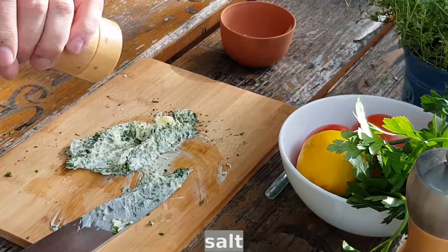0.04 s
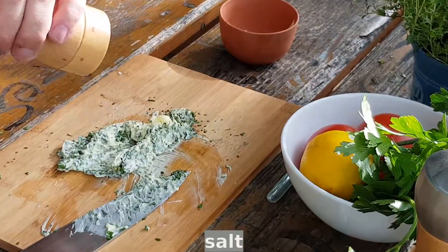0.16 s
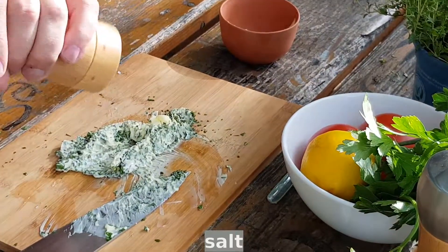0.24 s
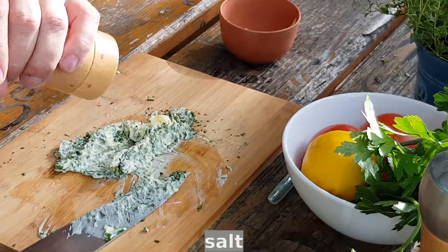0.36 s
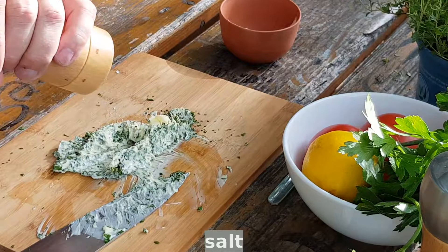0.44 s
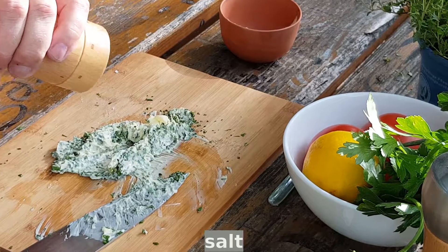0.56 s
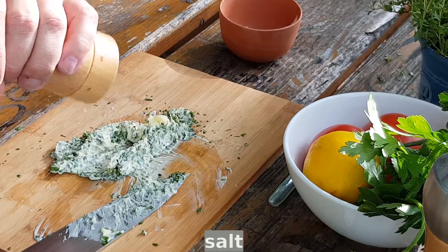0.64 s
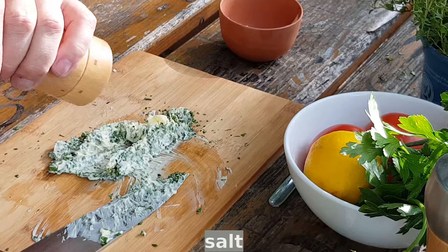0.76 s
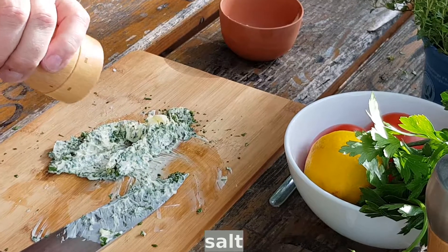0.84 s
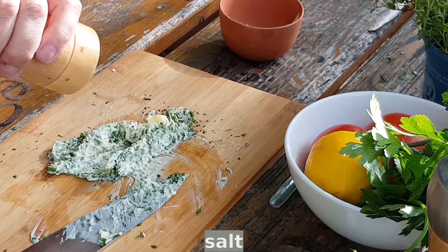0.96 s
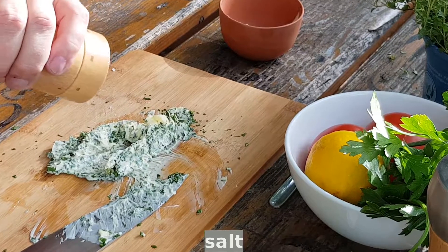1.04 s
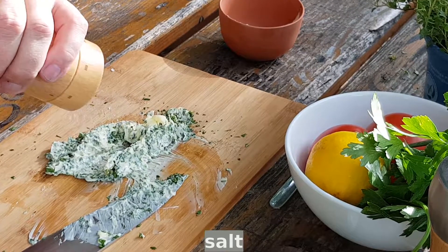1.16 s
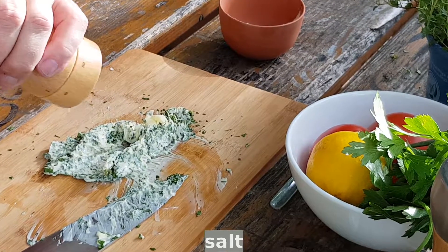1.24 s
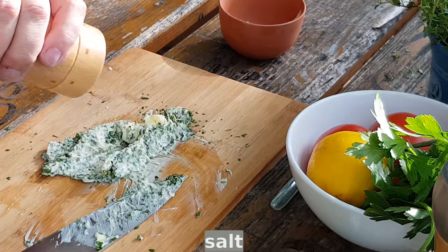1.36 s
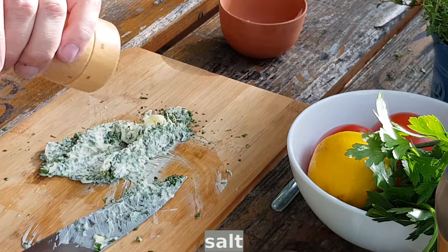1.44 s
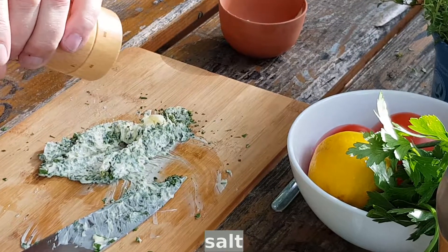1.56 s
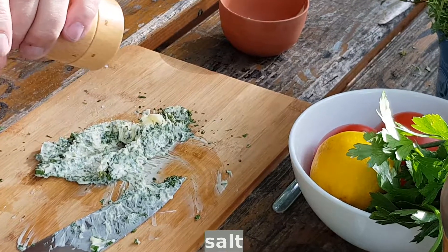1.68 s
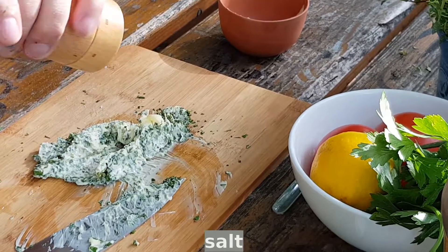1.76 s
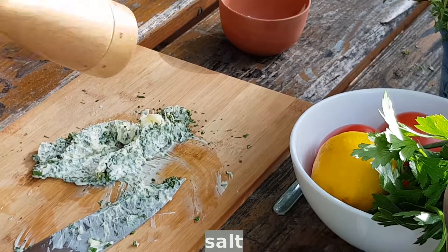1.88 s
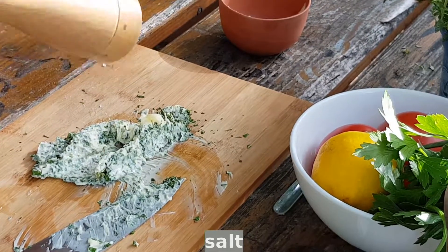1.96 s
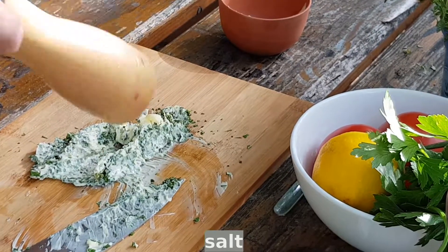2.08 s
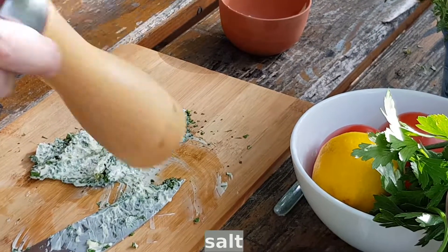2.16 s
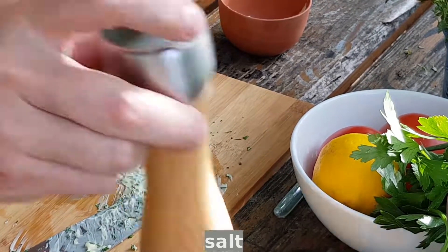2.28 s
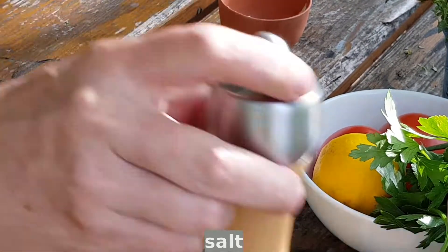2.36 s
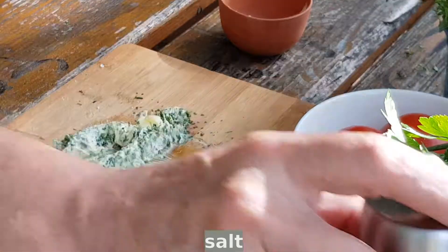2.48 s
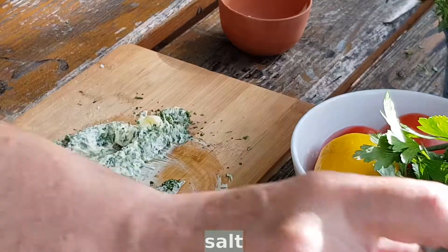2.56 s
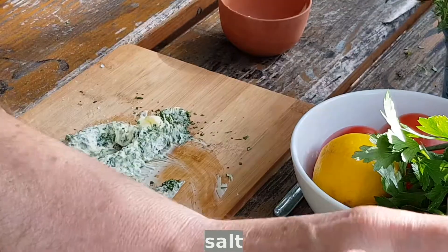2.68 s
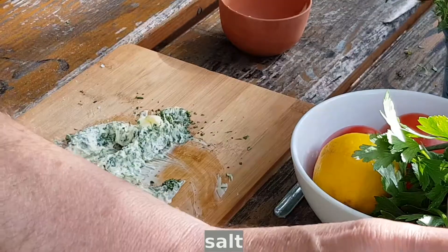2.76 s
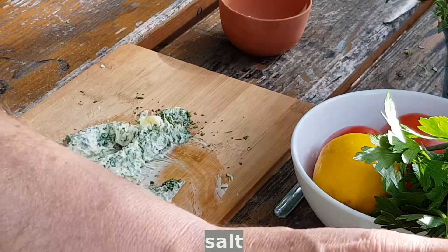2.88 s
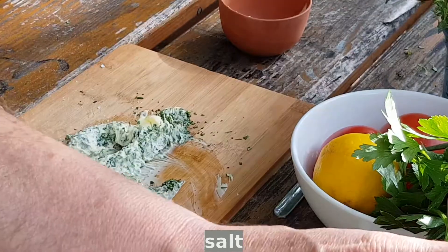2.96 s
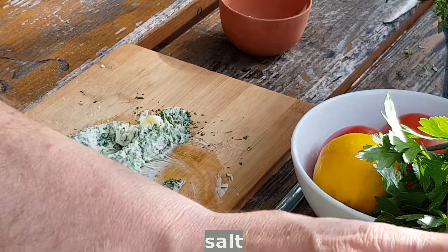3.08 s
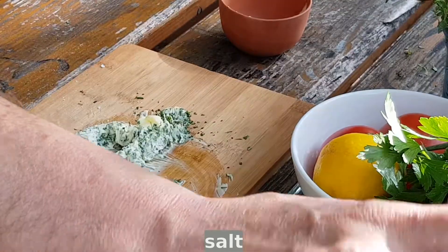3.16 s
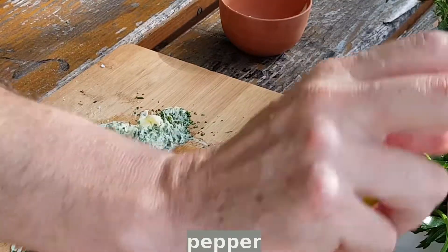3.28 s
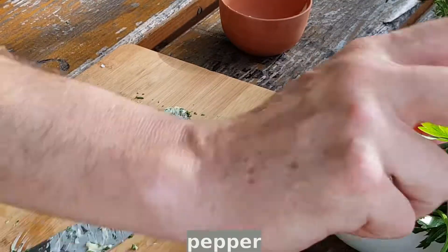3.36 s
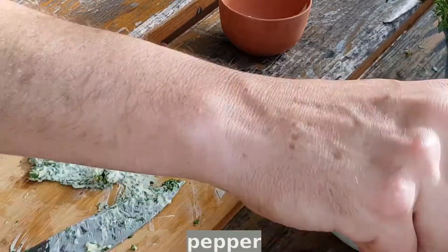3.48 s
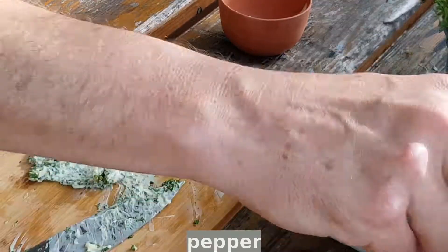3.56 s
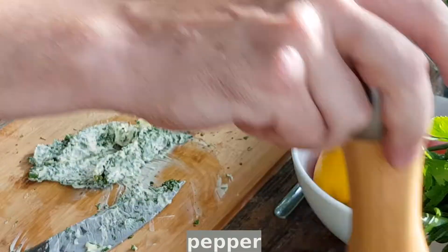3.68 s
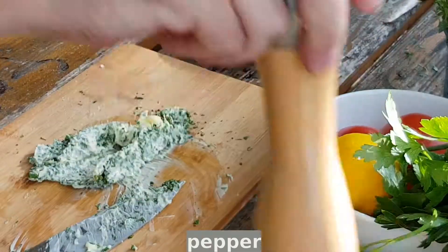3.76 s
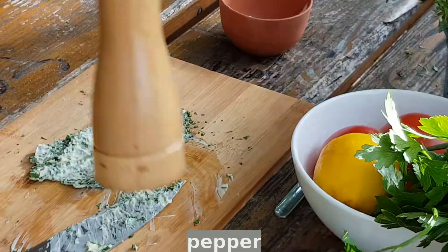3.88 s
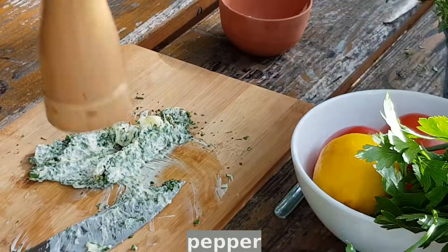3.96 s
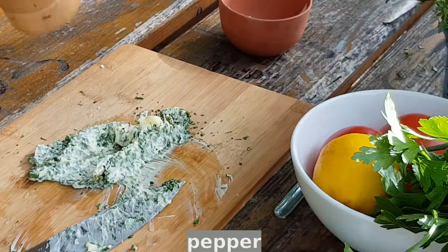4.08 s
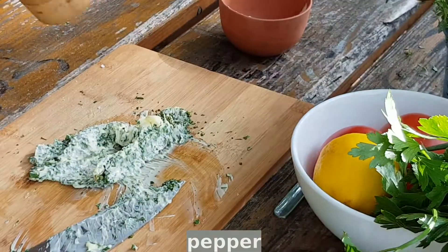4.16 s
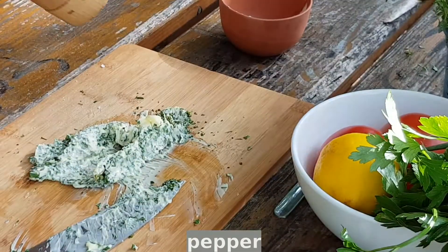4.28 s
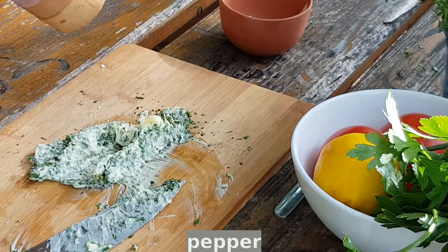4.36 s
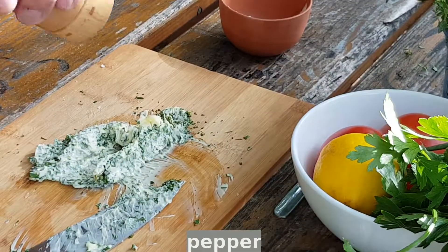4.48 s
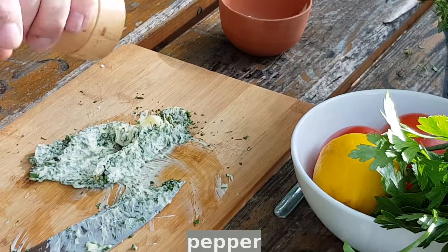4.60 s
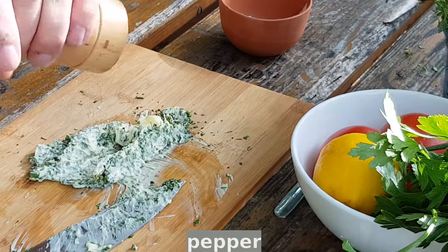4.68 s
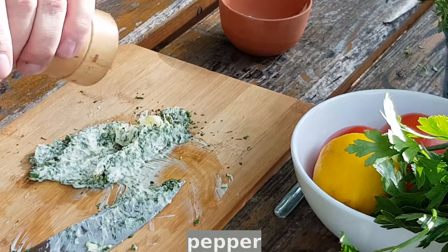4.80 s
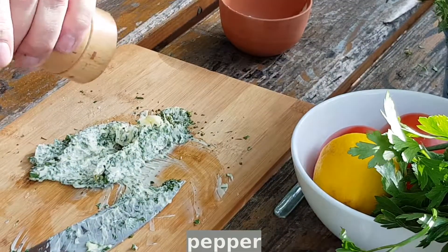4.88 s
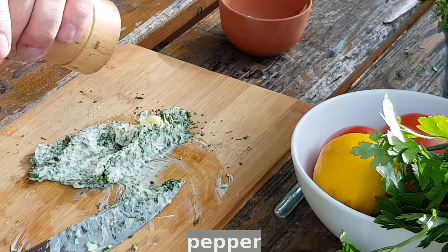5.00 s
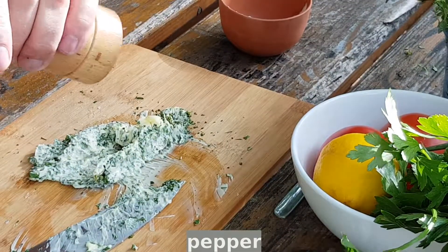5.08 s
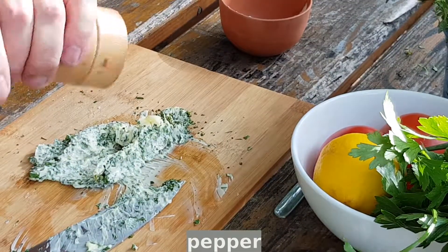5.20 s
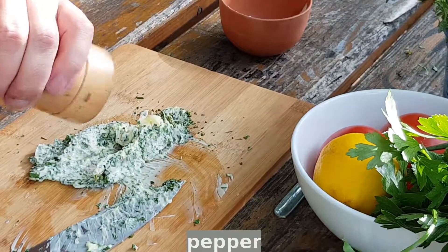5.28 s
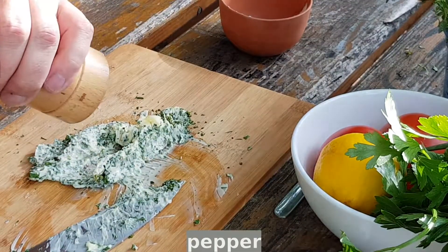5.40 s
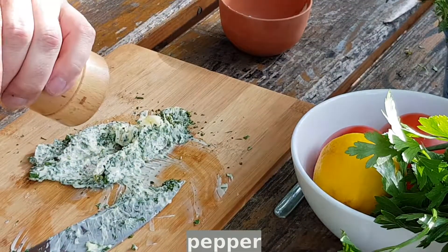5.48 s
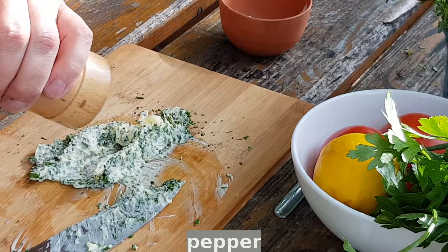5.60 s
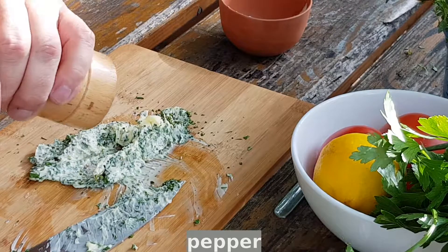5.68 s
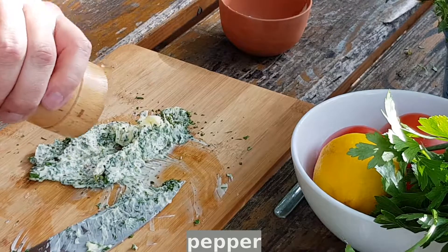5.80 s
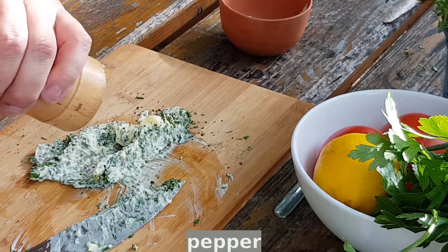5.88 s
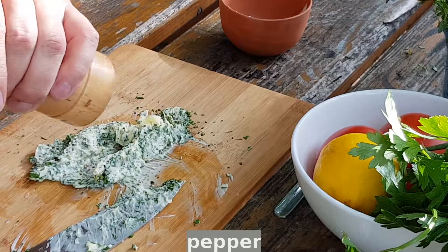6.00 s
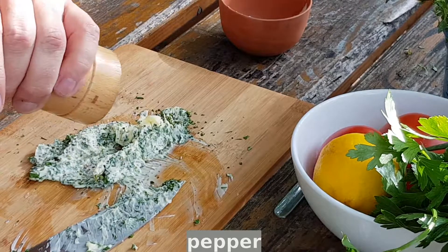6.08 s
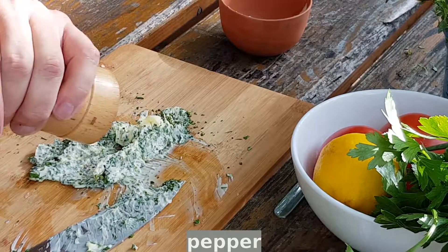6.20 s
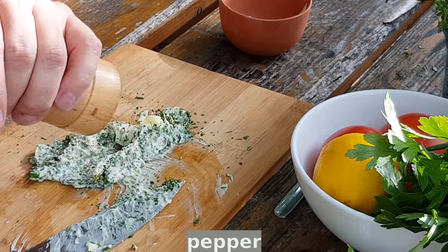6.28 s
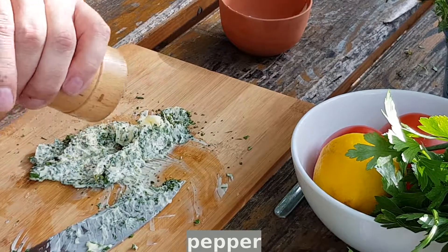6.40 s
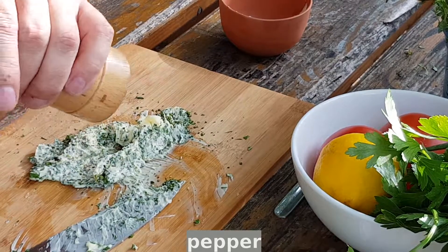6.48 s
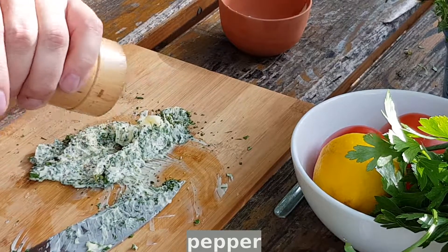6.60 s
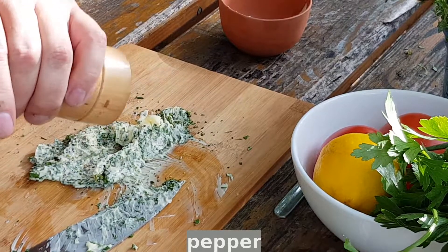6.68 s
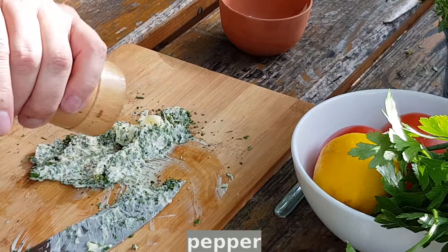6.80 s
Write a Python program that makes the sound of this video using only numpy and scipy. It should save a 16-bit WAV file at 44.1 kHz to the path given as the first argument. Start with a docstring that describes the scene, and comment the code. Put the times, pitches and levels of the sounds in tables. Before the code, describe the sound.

Close by at an outdoor table, a wooden salt mill is twisted four times, each turn a short, bright, gritty rasp with a few sharp cracks. It is set down with a knock, and after some faint clicks a pepper mill gives five coarser crunches. Gusts of wind rumble on the stereo microphone throughout, while very faint birds and traffic sit far behind.

```python
"""A puff of wind on the microphone, then the bright rasp of a wooden salt mill, close by at an outdoor table.
It is twisted four times and set down with a knock; a pepper mill is picked up and twisted five times.
Each twist crushes grains between the burrs: tiny fractures and a few sharp cracks ring in the barrel.
Gusts keep buffeting the stereo microphone; far off, birds whistle and traffic swells from the right."""
import sys
import numpy as np
from scipy import signal
from scipy.fft import rfft, irfft, next_fast_len
from scipy.io import wavfile
from scipy.ndimage import map_coordinates

SR = 44100
rng = np.random.default_rng(int(sys.argv[2]) if len(sys.argv) > 2 else 0)


def dump(signal):
    """Clip the signal to [-1, 1] and save it as 16-bit WAV at the path in sys.argv[1]."""
    limited = np.clip(np.atleast_2d(signal).T, -1, 1)
    pcm = np.round(limited * 32767).astype(np.int16)
    wavfile.write(sys.argv[1], SR, pcm)


N = 302085

# Levels in the tables are relative: each source applies its own gain.
# Strokes of each mill: (burrs catch [s], burrs stop [s], barrel [dB], burr [dB], splinters [dB],
# swell by the end [dB], hardening by the end [dB], brightness of the wedged burr [dB/octave])
SALT_TWISTS = [(0.155, 0.239, -37, -37.5, -43, -6, 5, 2), (0.56, 0.651, -39.5, -38, -43, -1.5, -1.5, 3),
               (0.934, 1.044, -39, -37.5, -40.5, -3, 1.5, 10),
               (1.307, 1.396, -41, -39, -43.5, 2.5, 2.5, 5.5)]
PEPPER_TWISTS = [(4.571, 4.621, -46.5, -37.5, -47.5, -3.5, -3.5, -6),
                 (4.634, 4.691, -42, -33, -48, -7.5, 1.5, -4.5),
                 (5.146, 5.232, -39, -38.5, -41.5, -3.5, -2.5, 6),
                 (5.626, 5.71, -39.5, -44, -47.5, -0.5, 2, -3.5), (6.075, 6.146, -41, -43.5, -54, 1, 13, 4),
                 (6.586, 6.657, -39, -33.5, -37.5, 1.5, -16, 3)]
# Big grains bursting; hard ones splinter, soft ones thump the barrel. The first salt row, just before the burrs
# catch, is instead the works clicking as the hand takes up the slack: (time [s], level [dB], hardness [dB])
SALT_CRACKS = [(0.133, -20.5, 6.5), (0.159, -18.5, 3), (0.175, -15.5, 5), (0.577, -16, 7.5),
               (0.616, -21, -2), (0.975, -8.5, -2), (1.019, -16, -8.5), (1.335, -12, -1), (1.39, -11, -1.5)]
PEPPER_CRACKS = [(4.575, -15, -2), (4.643, -23.5, -10), (5.146, -17.5, -0.5), (5.166, -13, -2),
                 (5.19, -11.5, -3.5), (5.631, -30.5, 17), (5.646, -15, 3.5), (6.065, -16, -2),
                 (6.099, -12.5, 0), (6.11, -18, 8), (6.156, -12.5, 0.5), (6.573, -24, 5),
                 (6.588, -12.5, 1.5)]
# Resonances of the wooden barrels and the burrs: (frequency [Hz], width [Hz], level [dB])
SALT_BARREL = [(647, 257, -7), (1190, 158, 2)]
SALT_BURR = [(1660, 240, -6), (2410, 830, -3), (3000, 300, -6.5), (3630, 340, -16)]
PEPPER_BARREL = [(498, 204, -4), (687, 166, 2), (1260, 326, -4.5)]
PEPPER_BURR = [(1720, 610, -0.5), (2875, 340, 5), (3930, 700, -3.5), (4260, 560, -5)]
# The snap of splintering grains: (frequency [Hz], level [dB])
SALT_SNAP = [(200, -12), (600, 1.5), (2000, 11.5), (4000, 1), (6000, -3), (7200, -10), (8500, 1),
             (10000, -3.5), (11200, 2.5), (13000, 3.5), (16000, -5)]
PEPPER_SNAP = [(200, -16), (600, -24), (2000, -15), (4000, 9), (5600, 0.5), (7000, -3), (8400, 3),
               (9400, -4.5), (10500, 3), (13000, 8), (14500, 0), (16000, 1.5)]
# Loose works clicking as a mill is moved: (time [s], level [dB], hardness [dB])
WORKS_CLICKS = [(1.452, -25.5, -2), (2.011, -30, 1), (2.445, -47.5, 10), (2.941, -37.5, 8.5),
                (3.898, -20.5, 4.5), (3.91, -36, 8), (4.292, -37.5, 4.5), (4.449, -29.5, 5.5),
                (4.5, -34, 2), (6.695, -35, 2)]
# The mills at the microphone, whose housing shades the treble: (frequency [Hz], left phase lead [rad])
MILL_PHASE = [(0, 0), (3600, 3), (8500, 4.5), (11000, 7), (14000, -0.5), (16000, 13)]
# Modes of the table under the salt mill: (frequency [Hz], level [dB], T60 before hand damping [s])
TABLE_MODES = [(411, 3, 0.13), (512, 2.5, 0.15), (639, 1, 0.1), (732, -5, 0.19), (900, -4, 0.03),
               (1010, -0.5, 0.13), (1187, -2, 0.11), (1390, -8, 0.1), (1460, -8, 0.024), (1530, -14, 0.12),
               (1586, -14, 0.11)]
# The thud of the landing mill and the rattle of its works: (frequency [Hz], level [dB])
LANDING_THUD = [(100, -48), (230, -16), (320, 12.5), (500, 5), (750, 8.5), (1100, 0), (1700, -22),
                (2700, -28), (4000, -38), (8000, -37)]
WORKS_RATTLE = [(800, -11), (1800, 1), (2800, 7), (4000, -34), (5000, -15), (8000, -9.5), (9500, -1),
                (11000, 7.5), (12500, 0), (16000, -13)]
# Close echoes off table top and crockery: (frequency [Hz], level against the direct sound [dB])
ECHO_LEVEL = [(300, -8.5), (1000, -5.5), (2500, -8), (4000, 3.5), (6000, 5.5), (12000, 0.5)]
# Decay of those echoes: (frequency [Hz], T60 [s])
ECHO_T60 = [(300, 0.19), (2000, 0.05), (6000, 0.025), (12000, 0.026)]
# The hand sliding on a mill: (peak time [s], rise [s], fall [s], level [dB])
HAND_SLIDES = [(2.018, 0.008, 0.099, -59), (3.67, 0.2, 0.3, -66), (3.835, 0.027, 0.08, -68),
               (3.93, 0.02, 0.095, -60), (4.01, 0.015, 0.11, -57.5), (4.09, 0.12, 0.24, -59.5)]
# Skin rubbing on wood: (frequency [Hz], level [dB])
SKIN_SPECTRUM = [(500, -22), (2000, 4), (5000, 0.5), (10000, 3.5), (16000, -5)]
# Light wind between the gusts: (time [s], level [dB])
LIGHT_WIND = [(0, -58.5), (0.9, -51.5), (1.45, -58), (3.7, -58.5), (4.15, -64.5), (4.7, -59), (6.85, -52)]
# Gusts on the microphone: (peak time [s], length [s], level [dB])
GUSTS = [(0.01, 0.091, -32), (0.347, 0.12, -46), (0.568, 0.2, -44), (0.808, 0.1, -40), (0.957, 0.36, -38.5),
         (1.214, 0.06, -45), (1.654, 0.2, -47), (1.773, 0.073, -46.5), (2.105, 0.27, -46.5),
         (2.393, 0.34, -48.5), (2.539, 0.036, -39.5), (2.621, 0.06, -41), (2.829, 0.038, -40),
         (3.189, 0.058, -44), (3.297, 0.082, -47), (3.547, 0.057, -43), (3.675, 0.41, -45),
         (4.906, 0.11, -39), (5.693, 0.08, -47.5), (6.653, 0.1, -40)]
# Rumble of eddies on the microphone: (frequency [Hz], level [dB])
BUFFET_SPECTRUM = [(12, -44), (20, -17), (44, -6), (65, 1.5), (119, -6), (178, -13.5), (282, -21),
                   (333, -23), (404, -28), (700, -36.5), (910, -48), (1540, -120)]
# Far birds: (time [s], length [s], start pitch [Hz], end pitch [Hz], level [dB])
BIRD_WHISTLES = [(0.81, 0.1, 2220, 2220, -63), (1.93, 0.1, 2090, 1880, -68),
                 (2.25, 0.11, 1310, 1450, -57.5), (4.3, 0.25, 2050, 2400, -68),
                 (4.88, 0.1, 1940, 1860, -63)]
# Far traffic drawing nearer: (time [s], level [dB])
TRAFFIC_LEVEL = [(0, -71), (1.7, -72.5), (2.4, -65.5), (3.2, -65.5), (4.3, -60.5), (6.85, -56.5)]
# The distant road and the hiss of the open air: (frequency [Hz], level [dB])
ROAD_SPECTRUM = [(100, 9.5), (300, 0.5), (600, 0), (950, 5), (1300, -3), (2000, -13), (3500, -32),
                 (8000, -38)]
AIR_SPECTRUM = [(180, -6.5), (300, -2), (656, -6.5), (828, -31), (1080, -9), (1970, -18.5), (3520, -20.5),
                (4910, -20.5), (12500, -21), (16000, -24.5)]

SWAP_S = 3.3  # the hand goes from the salt mill to the pepper mill


def salt_mill():
    """Close to the microphone, hard crystals break between the burrs: a dense, bright rasp."""
    twist = twisting(SALT_TWISTS, rise_s=0.069, fall_s=0.13, trim_db=[0, -0.5, 0.5])
    grit = fractures(per_s=4000, spread_db=5.3, clump_db=1.7, clump_rate=200)
    snaps = SALT_CRACKS + works_clicks(SALT_TWISTS, 0, SWAP_S)
    cracks = bursts(snaps, crumble_s=0.011, trim_db=[-0.5, 1.5, 0.5])
    return mill(twist * grit + cracks, SALT_TWISTS, SALT_BARREL, SALT_BURR, SALT_SNAP,
                detune=0.0085, left_db=0.5)


def pepper_mill():
    """At the same table, peppercorns break with a coarser, woodier crunch."""
    twist = twisting(PEPPER_TWISTS, rise_s=0.045, fall_s=0.1, trim_db=[0, -1.2, 0.6])
    grit = fractures(per_s=3200, spread_db=6, clump_db=2.4, clump_rate=180)
    snaps = PEPPER_CRACKS + works_clicks(PEPPER_TWISTS, SWAP_S, N / SR)
    cracks = bursts(snaps, crumble_s=0.0093, trim_db=[-1.5, 0, 0.5])
    return mill(twist * grit + cracks, PEPPER_TWISTS, PEPPER_BARREL, PEPPER_BURR, PEPPER_SNAP,
                detune=0.02, left_db=1.4)


def twisting(twists, rise_s, fall_s, trim_db):
    """Force on barrel, burr and splinters: it builds until the burrs catch, drifts, and lets go."""
    t, force = np.arange(N) / SR, np.zeros((3, N))
    for catch, stop, *levels, swell_db, hardening_db, _ in twists:
        drift_db = swell_db + hardening_db * np.array([[0], [1], [1]])
        progress = np.clip((t - catch) / (stop - catch), 0, 1)
        slack = np.maximum(catch - t, 0) / rise_s + np.maximum(t - stop, 0) / fall_s
        on = slack < 2
        force_db = np.array(levels)[:, None] + drift_db * progress[on] - 60 * slack[on]
        force[:, on] = np.maximum(force[:, on], amp(force_db))
    return force * amp(trim_db)[:, None]


def fractures(per_s, spread_db, clump_db, clump_rate):
    """Tiny breaks of very unequal size, bunched as the teeth catch and release; rms 1."""
    sizes = amp(spread_db * np.clip(rng.standard_normal(N), -2, 2)) * rng.choice([-1, 1], N)
    breaks = rng.random(N) < per_s / SR
    clumps = amp(clump_db * np.clip(wobble(clump_rate), -2, 2))
    return unit(breaks * sizes * clumps)


def works_clicks(twists, from_s, to_s, lead_s=0.025, take_up_db=-30):
    """The works click as the hand takes up the slack before a twist, and when the mill is moved."""
    take_ups = [(twist[0] - lead_s, take_up_db, 0) for twist in twists]
    return take_ups + [click for click in WORKS_CLICKS if from_s <= click[0] < to_s]


def bursts(cracks, crumble_s, trim_db):
    """Each big grain or click loads barrel, burr and splinters for a few milliseconds."""
    force, t = np.zeros((3, N + SR)), np.arange(SR // 40) / SR
    for s, db, hardness_db in cracks:
        burst = rng.standard_normal(len(t)) * amp(-60 * t / crumble_s)
        shares = amp(db + hardness_db * np.array([[-1], [0], [1]]))
        force[:, round(s * SR):][:, :len(t)] += shares * burst / np.linalg.norm(burst)
    return force[:, :N] * amp(trim_db)[:, None]


def mill(force, twists, barrel, burr, splinters, detune, left_db):
    """The fractures ring barrel and burr, differently as the head turns, and radiate their own snap."""
    sound, step = np.zeros(N + SR), SR // 25
    catches, *_, wedges = np.transpose(twists)
    sound[:N] = signal.fftconvolve(force[2], snap(splinters))[:N]
    for start in range(0, N, step):
        wedge_tilt = np.interp(start / SR, catches, wedges)
        for push, peaks, tilt in zip(force[:2, start:start + step], (barrel, burr), (0, wedge_tilt)):
            ring = signal.fftconvolve(push, resonator(peaks, tilt, detune))
            sound[start:start + len(ring)] += ring
    direct = at_microphone(sound[:N], lambda hz: np.interp(hz, *np.transpose(MILL_PHASE)), left_db)
    return direct + table_echoes(sound[:N])


def resonator(peaks, db_per_octave, detune, vary_db=2.0, size=2048):
    """The ring of barrel or burr, energy 1; grip and filling move every resonance a little."""
    hz = np.fft.rfftfreq(size, 1 / SR)
    centre, width, db = np.transpose(peaks)[:, :, None]
    pitch, level = rng.standard_normal((2, len(peaks), 1))
    polarity = (-1) ** np.arange(len(peaks))[:, None]
    gain = polarity * amp(db + db_per_octave * np.log2(centre) + vary_db * level)
    tuned_hz = centre * np.exp(detune * pitch)
    modes = gain * 1j * hz * width / (tuned_hz ** 2 - hz ** 2 + 1j * hz * width)
    ring = irfft(modes.sum(axis=0))
    return ring / np.linalg.norm(ring)


def snap(spectrum, size=2048):
    """A sudden impact: a minimum-phase click of energy 1 with the given spectrum."""
    magnitude = amp(along(spectrum, np.fft.rfftfreq(size, 1 / SR)))
    cepstrum = irfft(np.log(magnitude))
    cepstrum[1:size // 2] *= 2
    cepstrum[size // 2 + 1:] = 0
    click = irfft(np.exp(rfft(cepstrum)))
    return click / np.linalg.norm(click)


def set_down(landing_s=2.759):
    """The salt mill lands near the microphone: one hard push, the table rings and the works rattle."""
    t = np.arange(SR // 3) / SR
    knock = amp(-21.5) * table_ring(t, attack_s=0.002, hand_damping=1.35)
    push = snap(LANDING_THUD)
    knock[:len(push)] -= amp(3.5) * push
    shake = amp(-14 - 60 * t / 0.006) + amp(-36 - 60 * t / 0.095)  # a jolt and a faint tail
    attack = 1 - np.exp(-t / 0.0005)
    knock += shake * attack * noise(WORKS_RATTLE, channels=1)[0, :len(t)]
    sound = np.zeros(N)
    sound[round(landing_s * SR):][:len(t)] = knock
    direct = at_microphone(sound, lambda hz: -2 * np.pi * hz * 0.00001, left_db=3.5)
    return direct + amp(-2) * table_echoes(sound)


def table_ring(t, attack_s, hand_damping):
    """The table's modes fade, damped further by the hand and blurred by the loose planks."""
    ring = np.zeros(len(t))
    for hz, db, t60 in TABLE_MODES:
        blur = 1.32 * wobble(84)[:len(t)]
        ring += amp(db - 60 * t * hand_damping / t60) * np.sin(2 * np.pi * hz * t + blur)
    return ring * (1 - np.exp(-t / attack_s))


def table_echoes(x, size=128):
    """Close echoes off table and dishes, unrelated left and right; they change as the mill moves."""
    echoes, step = np.zeros((2, N + SR)), SR // 25
    for start in range(0, N, step):
        hz, t, grain = signal.stft(rng.standard_normal((2, SR // 10)), SR, nperseg=size)
        fade = amp(-60 * t / along(ECHO_T60, hz)[:, None])
        energy = np.sum(fade ** 2, axis=1, keepdims=True) * size / 2
        fade *= amp(along(ECHO_LEVEL, hz))[:, None] / np.sqrt(energy)
        _, response = signal.istft(grain * fade, SR, nperseg=size)
        echo = signal.fftconvolve(x[None, start:start + step], response, axes=1)
        echoes[:, start:start + echo.shape[1]] += echo
    return echoes[:, :N]


def handling():
    """Close and quiet, skin slides on wood as the hand shifts its grip."""
    rub = sum(amp(db) * swell(s, rise, fall, edge_db=16.4) for s, rise, fall, db in HAND_SLIDES)
    return rub * amp(1.6 * wobble(60)) * noise(SKIN_SPECTRUM)


def breeze(rise_share=0.43):
    """Gusts ride on a light wind; eddies strike both sides of the microphone, the left one harder."""
    gusts = [amp(db) * swell(s, rise_share * length, (1 - rise_share) * length, edge_db=15)
             for s, length, db in GUSTS]
    strength = np.maximum(fader(LIGHT_WIND), np.max(gusts, axis=0))
    eddies = noise(BUFFET_SPECTRUM, channels=3)
    flutter = amp(1.95 * np.array([wobble(22) for _ in eddies]))
    left, right, both = eddies * flutter
    buffet = unit(np.array([left, right]) + 0.79 * both)
    return amp(4.5) * strength * buffet * amp([[1.2], [-2.2]])


def birds():
    """Soft whistles from far away, most of them gliding, smeared by the distance."""
    song = np.zeros((2, N))
    for s, length, start_hz, end_hz, db in BIRD_WHISTLES:
        hz = np.linspace(start_hz, end_hz, round(length * SR))
        smear = 1.8 * np.array([wobble(140), wobble(120)])[:, :len(hz)]
        whistle = np.sin(2 * np.pi * np.cumsum(hz) / SR + smear)
        song[:, round(s * SR):][:, :len(hz)] += amp(db) * np.hanning(len(hz)) * whistle
    return song


def traffic():
    """A far road swells, reaching the right side of the microphone first."""
    road = noise(ROAD_SPECTRUM, channels=1)
    direct = at_microphone(road, lambda hz: -2 * np.pi * hz * 0.00032, left_db=0.5)
    diffuse = 0.5 * noise(ROAD_SPECTRUM)
    waver = amp(1.1 * wobble(7))
    return amp(6.5) * fader(TRAFFIC_LEVEL) * waver * unit(direct + diffuse)


def open_air():
    """A faint, steady hiss all around."""
    return amp(-60) * noise(AIR_SPECTRUM)


def at_microphone(x, lead, left_db):
    """One source in stereo: the left side is lead(hz) radians ahead and left_db louder."""
    side = np.array([[1], [-1]])
    return amp(side * left_db / 2) * filtered(x, lambda hz: np.exp(1j * side * lead(hz) / 2))


def amp(db):
    """Decibels to gain."""
    return 10 ** (np.asarray(db) / 20)


def unit(x):
    """Scaled to rms 1."""
    return x / np.sqrt(np.mean(x ** 2) + 1e-20)


def along(points, hz):
    """(frequency, value) points read on a log axis."""
    knots_hz, values = np.transpose(points)
    return np.interp(np.log(hz + 1), np.log(knots_hz + 1), values)


def fader(points):
    """One gain per sample from (time, level) points, silent outside them."""
    s, db = np.transpose(points)
    return np.nan_to_num(amp(np.interp(np.arange(N) / SR, s, db, np.nan, np.nan)))


def swell(peak_s, rise_s, fall_s, edge_db):
    """A gain of 1 at peak_s that is edge_db down rise_s earlier and fall_s later."""
    t = np.arange(N) / SR - peak_s
    return amp(-edge_db * np.minimum(np.maximum(-t / rise_s, t / fall_s), 20))


def wobble(rate):
    """A smooth random curve, rate knots a second."""
    knots = rng.standard_normal(int(N * rate / SR) + 4)
    return map_coordinates(knots, [np.arange(N) * rate / SR])


def filtered(x, response):
    """x through a complex frequency response."""
    size = next_fast_len(N + SR // 4)
    return irfft(rfft(x, size) * response(np.fft.rfftfreq(size, 1 / SR)), size)[..., :N]


def noise(spectrum, channels=2):
    """Unrelated coloured noises of rms 1."""
    return unit(filtered(rng.standard_normal((channels, N)), lambda hz: amp(along(spectrum, hz))))


def scene():
    """Both mills up close on the outdoor table, wind on the microphone, birds and road far behind."""
    foreground = salt_mill() + set_down() + pepper_mill() + handling()
    return foreground + breeze() + birds() + traffic() + open_air()


def record(dry, top_hz=16000):
    """The microphone chain passes nothing above its band limit."""
    return filtered(dry, lambda hz: hz < top_hz)


dry = scene()
out = record(dry)
dump(out)
```